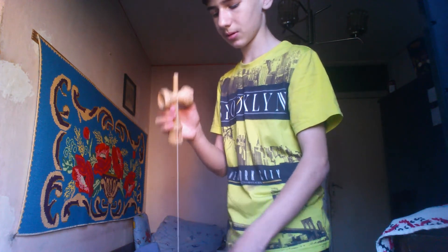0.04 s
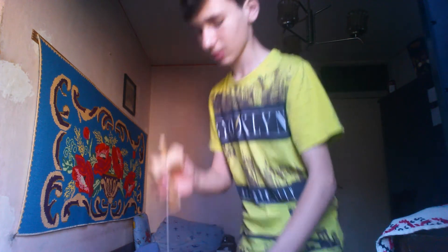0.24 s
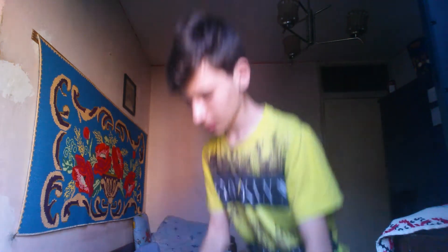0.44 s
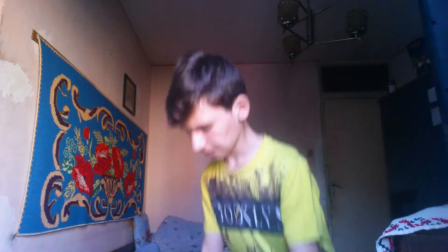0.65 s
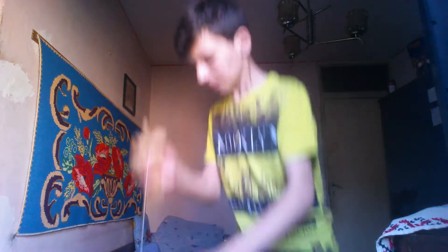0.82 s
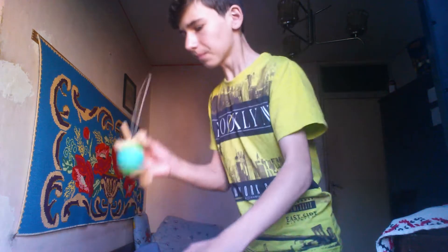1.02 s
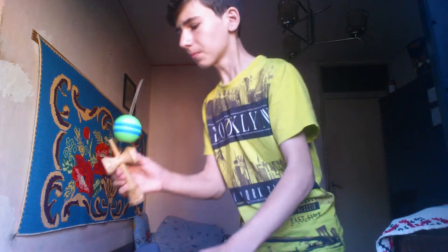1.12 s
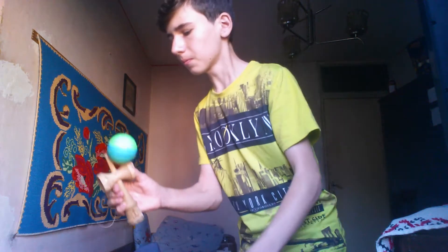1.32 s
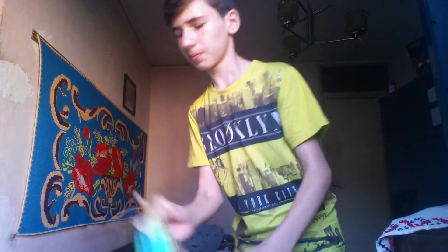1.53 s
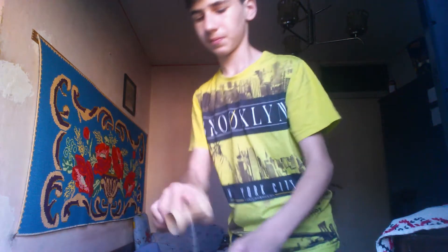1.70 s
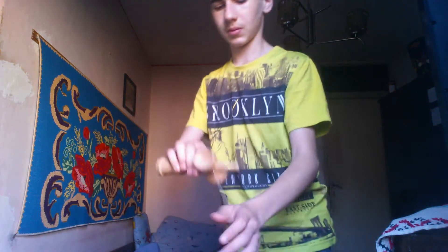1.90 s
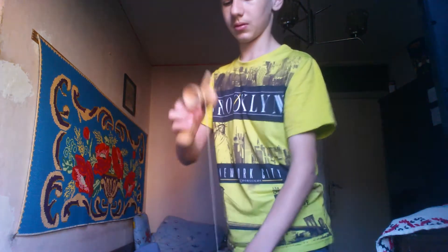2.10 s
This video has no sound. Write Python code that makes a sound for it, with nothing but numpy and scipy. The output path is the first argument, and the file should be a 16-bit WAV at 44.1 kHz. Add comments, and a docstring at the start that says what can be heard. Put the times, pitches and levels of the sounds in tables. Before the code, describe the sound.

A wooden ball clacks three times against a toy's wooden handle, the second hit loudest. Soft thuds and a faint rustle of clothes come first. The clacks sit right of the microphone in a small, bare room.

```python
"""Clothes rustle and a few dull thuds sound as a player crouches with a kendama in a small bare room.
The ball is pulled up on its string and clacks three times against the wooden handle, right of the
stereo microphone: each time a short crack and a ring of the wood. Near walls answer every blow;
a faint hum and hiss lie underneath as room tone."""
import sys
import numpy as np
from scipy import signal
from scipy.fft import rfft, irfft
from scipy.io import wavfile
from scipy.ndimage import uniform_filter1d, minimum_filter1d

SR = 44100
rng = np.random.default_rng(int(sys.argv[2]) if len(sys.argv) > 2 else 0)


def digitize_waveform(pressure):
    """Quantize a signal to 16-bit integers and store it at the path in sys.argv[1].

    Rows of a 2-D input are taken as channels; values are limited to [-1, 1].
    """
    field = np.atleast_2d(pressure).T
    bounded = np.clip(field, -1, 1)
    quanta = np.round(bounded * 32767).astype(np.int16)
    wavfile.write(sys.argv[1], SR, quanta)


N = 94859
T = np.arange(N) / SR
FREQS = np.fft.rfftfreq(N, 1 / SR)
BLOW_SAMPLES = 8192

# ball on handle, five contacts in three clacks, plus a hollow echo about 6 ms after the first clack:
# t/s, wood/dB, treble cut-off/Hz, hollow of the ball/dB, its pitch/Hz, thump of the held handle/dB,
# tick of the spike/dB, its pitch/Hz, scrape/dB
CLACKS = [(1.2873, -21, 4940, -10.5, 880, -27, -4, 4300, -36),
          (1.2915, -1.5, 2650, 2.5, 720, -10.5, -13, 3720, -15),
          (1.2974, -14, 2140, 5, 826, -24, -24, 3760, -29),
          (1.5232, 11.5, 10800, 4.5, 977, -8, -9, 4830, -18.5),
          (1.7880, -19, 3270, -26, 905, -15, -11, 4000, -25),
          (1.7910, -3, 1850, -17.5, 880, 1, -7.5, 5100, -56)]
# colour of the wood's short crack: f/Hz, level/dB
CRACK_COLOUR = [(100, -41), (500, -19.5), (1000, -9), (1280, -20.5), (1650, 0.5), (2400, -3.5), (3000, 0.5),
                (3700, 0.5), (4350, 1), (5000, -28), (6800, -19.5), (8200, -22.5), (9800, -4.5),
                (11000, -32), (15000, -39)]
# all-pass stages for the crack's travel through the wood: f/Hz, Q
DISPERSION = [(1900, 3.8), (3300, 2.7), (3600, 1.95)]
# modes of handle and ball: f/Hz, level/dB, t60/s
WOOD_MODES = [(1485, 12, 0.21), (1600, -18, 0.09), (1990, -18, .07), (2196, 9, 0.041), (2500, 2.5, 0.021),
              (2503, 5.5, .07), (3070, -2, 0.19), (3170, -15.5, .08), (3580, 0, .06), (3657, 5.5, 0.042),
              (3505, 12, 0.023), (3750, -12, .06), (4460, -14, .06)]
# modes of the ball's hollow: multiple of its pitch, level/dB, t60/s
HOLLOW_MODES = [(.83, -15.5, .02), (.97, -8.5, .025), (1.1, -1, .015)]
# low modes of the held handle: f/Hz, level/dB, t60/s
HANDLE_MODES = [(193, -23, 0.071), (337, -4.5, 0.012), (441, -1, 0.11), (539, 4.5, 0.041)]
# thuds of the string and the moving body: t/s, level/dB, pitch/Hz
THUD_EVENTS = [(.0512, -13.5, 710), (.3358, -7, 726), (.3388, -5.5, 676), (.4650, -3.5, 547),
               (.4680, -2.5, 605), (2.0486, -6, 590)]
# colour of one thud: multiple of its pitch, level/dB
THUD_COLOUR = [(.06, -9.5), (.15, -18.5), (.3, -8), (.6, -4.5), (1, 3), (1.5, -8), (2, -20), (4, -27.5),
               (8, -37)]
# swishes of the clothes: peak t/s, rise/s, fall/s, hiss/dB, flapping/dB
CLOTH_MOVES = [(.25, 0.28, 0.12, -80, -63), (.47, 0.18, 0.17, -58.5, -54.5), (.92, 0.15, 0.21, -65, -63),
               (1.69, 0.15, 0.3, -62.5, -58), (2.08, 0.087, 0.1, -64.5, -59)]
# colour of the cloth's hiss: f/Hz, level/dB
CLOTH_HISS_COLOUR = [(500, 14), (1000, 2), (1900, 6.5), (2800, 0.5), (7000, 0), (11000, -5.5), (15000, -18)]
# low flapping of the cloth, with the room's resonance near 222 Hz: f/Hz, level/dB
FLAP_IN_ROOM = [(30, -16), (100, -7), (180, -2), (222, 4.5), (265, -2.5), (400, -3), (650, -1.5), (950, -2),
                (1250, -8), (2000, -10), (4000, -23)]
# echoes off near surfaces: delay/s, left/dB, right/dB
NEAR_ECHOES = [(.0054, -16.5, -6), (.009, -43, -11.5)]
# diffuse tail of the room: f/Hz, t60/s, level/dB, left minus right/dB, likeness of the sides (0-1)
ROOM_TAIL = [(95, 0.42, 11, 7, 1), (231, 0.75, 4, -3.5, 1), (594, 0.31, 5, 3.5, 1),
             (1024, 0.31, 9, 3.5, 0.16), (2030, 0.26, 7, -3.5, 0.56), (3900, 0.28, -0.5, -5, 0.04),
             (9780, 0.27, -2.5, -8.5, 0)]
# colour of the room's steady hiss: f/Hz, level/dB
AIR_COLOUR = [(25, -8.5), (45, -2), (65, -26), (110, 1.5), (180, -5.5), (300, -10), (600, -11.5),
              (1000, -13), (1500, -18), (2200, -18.5), (6500, -17), (10500, -18), (11400, -14),
              (12400, -19), (15500, -20)]
# how alike hiss and cloth noise arrive on the two sides: f/Hz, likeness (0-1)
NOISE_LIKENESS = [(50, 0.57), (500, 1), (1500, 0), (10000, 0.16)]
# partials of the hum: f/Hz, level/dB
HUM_PARTIALS = [(46, -77.5), (95, -80.5), (118, -100), (188, -74), (237, -79)]
# response of the microphone: f/Hz, gain/dB
MIC_RESPONSE = [(20, -18), (33, -11), (45, 1), (1060, 0), (1220, -9), (1400, -3.5), (1550, -2),
                (15000, 0.5)]

RING_DB, SPIKE_RISE_S = -9, 0.00038
SCRAPE_TOP_HZ, SCRAPE_T60_S = 10800, 0.0053
RADIATE_HZ = 198  # so small a toy radiates little below this
FLUTTER_HZ, FLUTTER_DB = 44.2, 1.5
ROOM_GAP_S, ROOM_BUILD_S, THUD_ROOM_DB = 0.0005, 0.0011, -7
EARLY_DB, EARLY_T60_S = -8.5, 0.023  # dense first scatter from the body and the nearest wall
AIR_DB, WHINE_HZ, WHINE_DB, WHINE_T60_S = -64.5, 1070, -67, 0.71
KNOCK_PAN_DB, THUD_PAN_DB, AIR_PAN_DB = -7.5, 1, -5  # left minus right
KNOCK_LAG_S, DIFFUSE_LEAD_S = .00005, 0.000285  # the left side gets knocks late, diffuse sound early
CEILING, TOP_HZ = .6, 15600


def knocks():
    """Wood on wood: a crack and a short ring, duller for soft contact; the spot struck sets the mix."""
    out, t = np.zeros(N), np.arange(BLOW_SAMPLES) / SR
    wood = disperse(click(CRACK_COLOUR) + amp(RING_DB) * ring(WOOD_MODES))
    for s, wood_db, cutoff_hz, hollow_db, hollow_hz, thump_db, spike_db, spike_hz, scrape_db in CLACKS:
        hollow = ring([(hollow_hz * k, db, t60) for k, db, t60 in HOLLOW_MODES])
        body = amp(wood_db) * wood + amp(hollow_db) * hollow + amp(thump_db) * ring(HANDLE_MODES)
        scrape = lowpass(rng.standard_normal(BLOW_SAMPLES), SCRAPE_TOP_HZ) * fade(t, SCRAPE_T60_S)
        scrape *= amp(scrape_db) / np.linalg.norm(scrape)
        out += delay(lowpass(body, cutoff_hz) + amp(spike_db) * spike_tick(spike_hz) + scrape, s)
    return signal.lfilter(*signal.butter(2, RADIATE_HZ, "high", fs=SR), out)


def ring(modes):
    """Struck modes swing and die away; each level is the height of its resonance."""
    t, swing = np.arange(BLOW_SAMPLES) / SR, 0
    for hz, db, t60 in modes:
        omega, damping = 2 * np.pi * hz, np.log(1000) / t60
        swing += amp(db) * 2 * damping / omega * np.sin(omega * t) * fade(t, t60)
    return np.diff(swing, prepend=0)


def disperse(x):
    """Travel through the wood draws a sharp pulse out into a few cycles."""
    for hz, q in DISPERSION:
        poles = signal.iirpeak(hz, q, fs=SR)[1]
        x = signal.lfilter(poles[::-1], poles, x)
    return x


def spike_tick(hz):
    """The thin spike's tick swells and dies within a few cycles; gain 1 at its pitch."""
    t = np.arange(BLOW_SAMPLES) / SR
    swell = t * np.exp(-t / SPIKE_RISE_S)
    return 2 * swell / swell.sum() * np.sin(2 * np.pi * hz * t)


def thuds():
    """String and moving body give soft, heavily damped bumps of a cycle or two."""
    out = np.zeros(N)
    for s, db, hz in THUD_EVENTS:
        bump = click([(hz * k, level_db) for k, level_db in THUD_COLOUR])
        out -= amp(db) * delay(bump, s)
    return out


def clothes():
    """Each move of the body swells a cloth hiss and an uneven low flapping that stirs a room mode."""
    hiss, flap = 0, 0
    for s, rise, fall, hiss_db, flap_db in CLOTH_MOVES:
        move = np.exp(-((T - s) / np.where(T < s, rise, fall)) ** 2)
        hiss += amp(hiss_db) * move
        flap += amp(flap_db) * move
    flutter = amp(FLUTTER_DB * wander(FLUTTER_HZ))
    return hiss * noise(CLOTH_HISS_COLOUR) * flutter ** 0.1 + flap * noise(FLAP_IN_ROOM) * flutter


def room_response():
    """The bare room from the microphone: near surfaces, and a diffuse tail whose bass lasts longest."""
    white, out = stereo_spectra(read(ROOM_TAIL, FREQS, column=4)), np.zeros((2, N))
    centres = np.geomspace(60, 16000, 17)
    for hz, weights in zip(centres, np.eye(len(centres))):
        band = irfft(white * read(np.c_[centres, weights], FREQS), N)
        t60, db, pan_db = (read(ROOM_TAIL, hz, column) for column in (1, 2, 3))
        gain = amp(db) * np.sqrt(2 * np.log(1000) / (t60 * SR))
        out += band * fade(T, t60) * gain * pan(pan_db)
    build_up = np.clip((T - ROOM_GAP_S) / ROOM_BUILD_S, 0, 1)
    out *= build_up * (1 + amp(EARLY_DB) * fade(T, EARLY_T60_S))
    for s, left_db, right_db in NEAR_ECHOES:
        out[:, int(s * SR)] += amp([left_db, right_db])
    return out


def room_tone():
    """Steady hiss, a faint wavering hum, and a thin tone that dies away at the start."""
    hum = sum(amp(db) * np.sqrt(2) * np.sin(2 * np.pi * hz * T + 0.24 * wander(hz=2.3))
              for hz, db in HUM_PARTIALS)
    whine = amp(WHINE_DB) * np.sin(2 * np.pi * WHINE_HZ * T + 0.37 * wander(hz=24)) * fade(T, WHINE_T60_S)
    return (amp(AIR_DB) * noise(AIR_COLOUR) + hum + whine) * pan(AIR_PAN_DB)


def noise(colour):
    """Coloured stereo noise, largely alike in the bass."""
    return unit_rms(irfft(stereo_spectra(read(NOISE_LIKENESS, FREQS)) * amp(read(colour, FREQS)), N))


def stereo_spectra(likeness):
    """Spectra of two white noises that are partly alike, the right one slightly late."""
    mid, side = rfft(rng.standard_normal((2, N)))
    mid *= np.sqrt((1 + likeness) / 2)
    side *= np.sqrt((1 - likeness) / 2)
    late = np.exp(-2j * np.pi * FREQS * DIFFUSE_LEAD_S)
    return np.array([mid + side, (mid - side) * late])


def wander(hz):
    """Random drift with a spread of 1, mostly slower than hz."""
    return unit_rms(irfft(rfft(rng.standard_normal(N)) / (1 + (FREQS / hz) ** 4), N))


def click(colour):
    """The shortest causal pulse that has this spectrum."""
    cepstrum = irfft(np.log(amp(read(colour, np.fft.rfftfreq(BLOW_SAMPLES, 1 / SR)))))
    cepstrum[1:BLOW_SAMPLES // 2] *= 2
    cepstrum[BLOW_SAMPLES // 2 + 1:] = 0
    return irfft(np.exp(rfft(cepstrum)))


def read(table, hz, column=1):
    """A column of a table, joined by straight lines over log frequency."""
    rows = np.array(table, float)
    return np.interp(np.log(np.maximum(hz, 1)), np.log(rows[:, 0]), rows[:, column])


def pan(db):
    """Left and right gains for a level difference."""
    return amp(np.array([[db], [-db]]) / 2)


def lowpass(x, hz):
    return signal.lfilter(*signal.butter(2, hz, fs=SR), x)


def fade(t, t60):
    return np.exp(-np.log(1000) * t / t60)


def delay(x, s):
    return np.pad(x, (int(s * SR), N))[:N]


def amp(db):
    return 10 ** (np.asarray(db) / 20)


def unit_rms(x):
    return x / np.sqrt(np.mean(x ** 2))


def scene():
    """At the microphone: clacks to the right, thuds near the centre, walls close by."""
    wood, bumps = knocks(), thuds()
    direct = np.array([delay(wood, KNOCK_LAG_S), wood]) * pan(KNOCK_PAN_DB) + bumps * pan(THUD_PAN_DB)
    into_room = wood + amp(THUD_ROOM_DB) * bumps
    walls = signal.fftconvolve(into_room[None], room_response(), axes=1)[:, :N]
    return direct + walls + clothes() + room_tone()


def record(dry):
    """The microphone colours the sound, a fast limiter holds the loudest peak, and the top is cut."""
    picked_up = signal.fftconvolve(dry, click(MIC_RESPONSE)[None], axes=1)[:, :N]
    gain = CEILING / np.maximum(np.abs(picked_up), CEILING)
    limited = picked_up * uniform_filter1d(minimum_filter1d(gain, size=65), size=65)
    return signal.sosfilt(signal.ellip(10, .2, 70, TOP_HZ, fs=SR, output="sos"), limited)


dry = scene()
out = record(dry)
digitize_waveform(out)
```